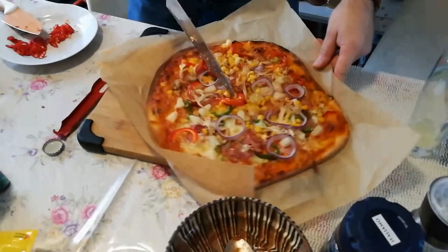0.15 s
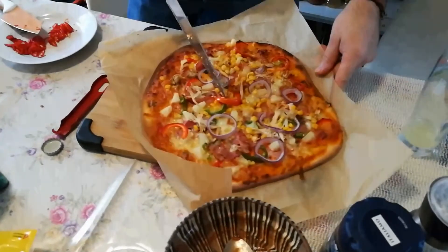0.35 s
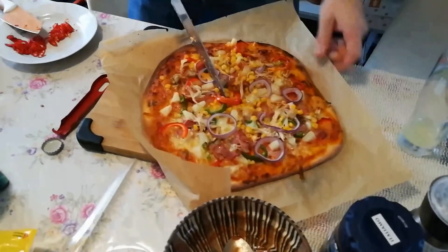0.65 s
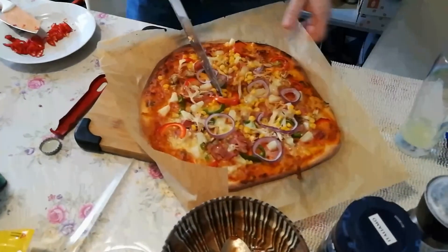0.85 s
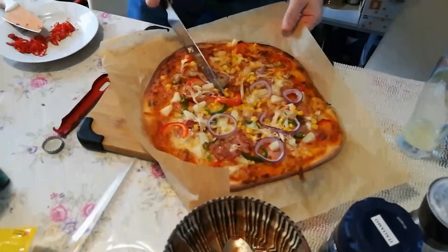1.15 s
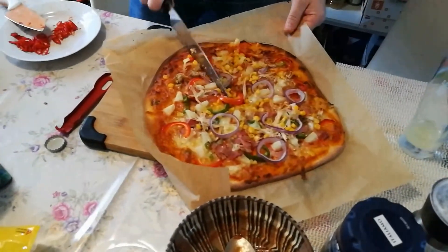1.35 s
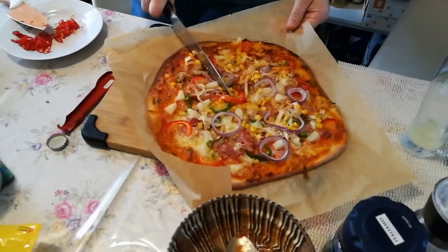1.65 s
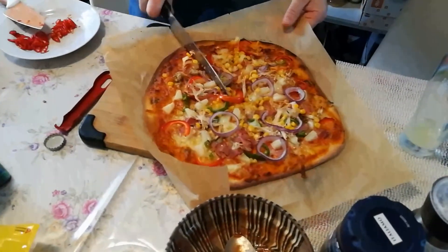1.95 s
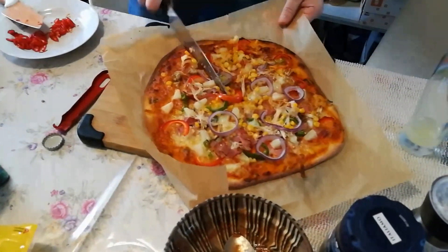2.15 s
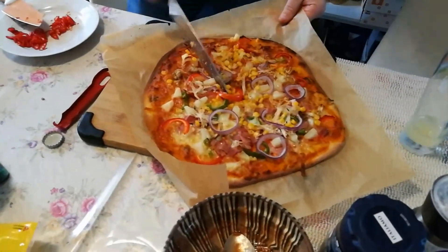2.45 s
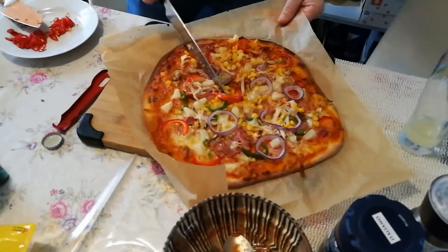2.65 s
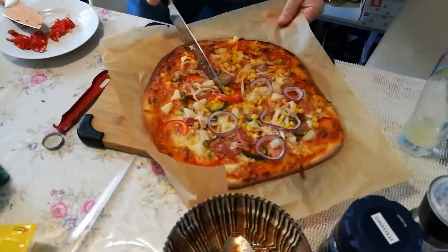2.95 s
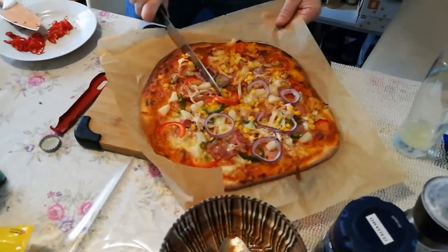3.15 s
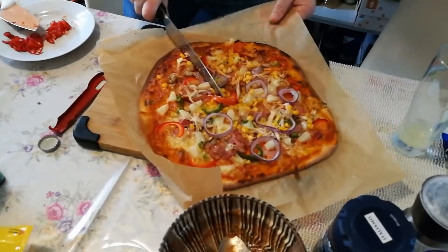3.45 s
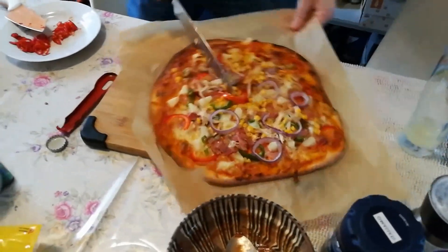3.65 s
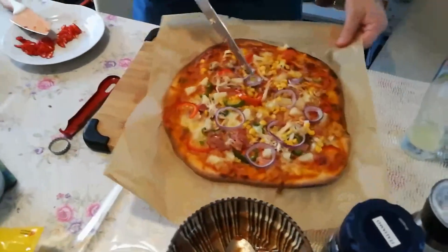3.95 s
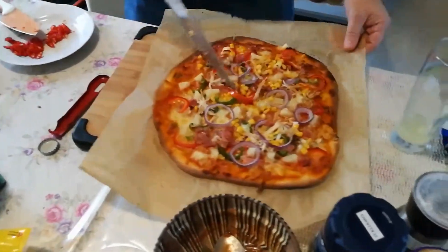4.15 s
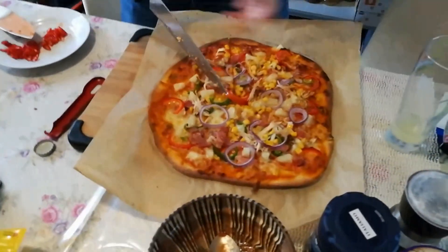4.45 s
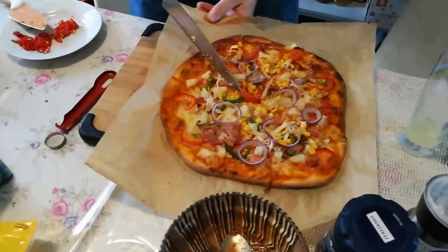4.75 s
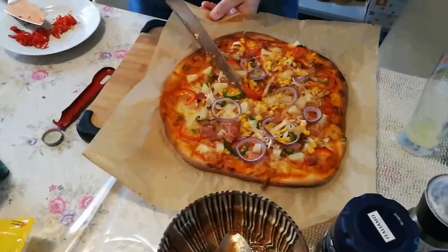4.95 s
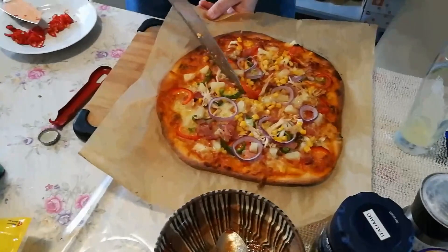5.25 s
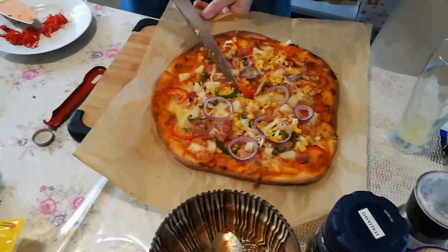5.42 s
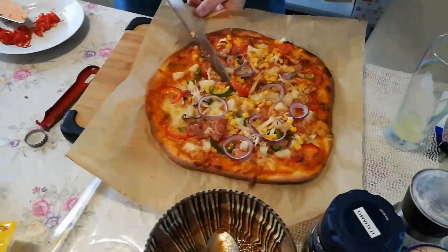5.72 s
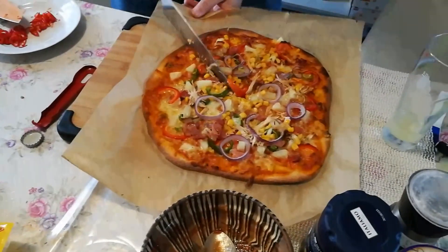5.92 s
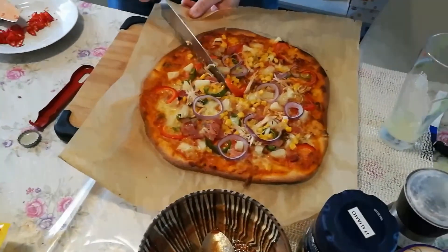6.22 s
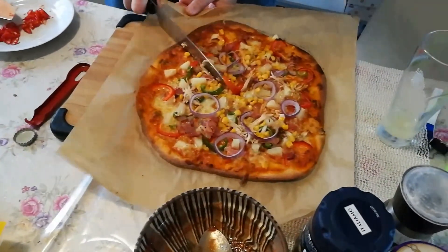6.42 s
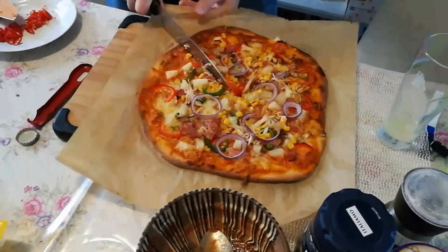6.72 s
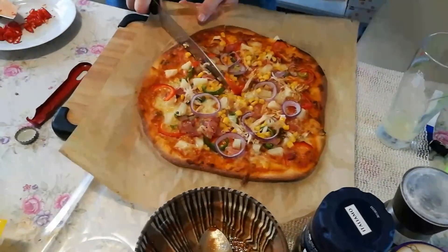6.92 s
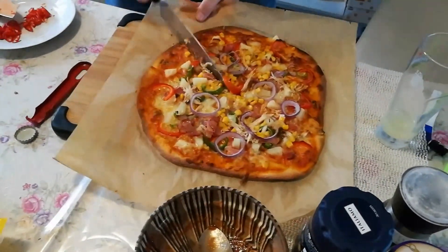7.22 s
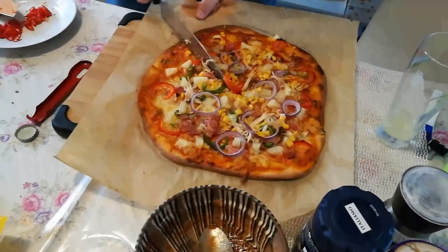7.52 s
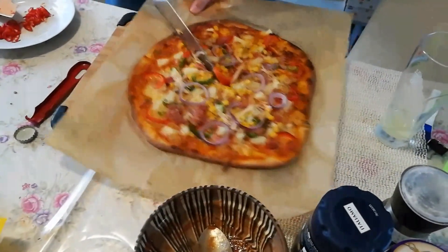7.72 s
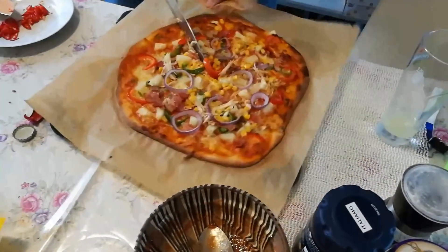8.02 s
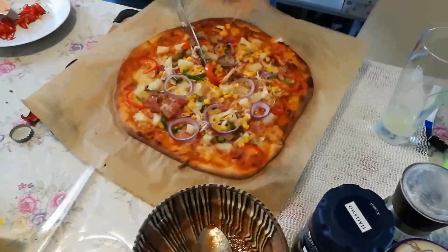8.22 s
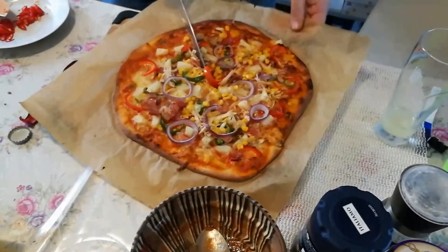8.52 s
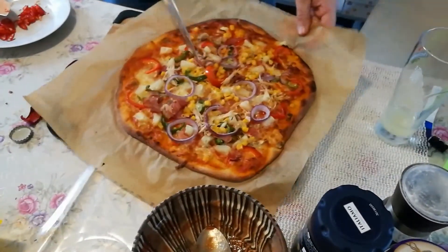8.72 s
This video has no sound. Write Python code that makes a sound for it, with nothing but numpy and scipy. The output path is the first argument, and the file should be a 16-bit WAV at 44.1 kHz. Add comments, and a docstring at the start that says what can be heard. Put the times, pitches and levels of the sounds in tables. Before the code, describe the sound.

Close stereo pickup from above a kitchen table. Baking paper rustles sharply and fades, then a knife presses through crisp crust with short dry crunches, ticks and knocks. Around the middle the paper is dragged in crackling bursts, a brief lull follows, more cutting comes, and the loudest dragging ends it. Low board thumps lie beneath, in a small room with a faint fridge whine.

```python
"""A knife saws through a crisp pizza crust on baking paper over a wooden board; between cuts a hand drags the paper.
Crumbs and paper crackle as streams of tiny noise fractures in size bands; single fractures crack, tick and knock.
The pressed crust crunches duller through the board modes; table top, flexing board and legs hum low as ringing noise.
Two microphone ports hear it from above in a small quiet kitchen with a short room tail and a faint fridge whine."""
import sys
import numpy as np
from scipy import signal
from scipy.fft import rfft, irfft, next_fast_len
from scipy.io import wavfile
from scipy.ndimage import uniform_filter1d

SR = 44100
rng = np.random.default_rng(int(sys.argv[2]) if len(sys.argv) > 2 else 0)


def unload_audio(sound):
    """Save the sound as a 16-bit wav file, at the path given as the first command line argument."""
    columns = np.transpose(np.atleast_2d(sound))
    # keep every value between -1 and 1, then stretch to whole-number steps
    steps = np.round(np.clip(columns, -1, 1) * 32767)
    wavfile.write(sys.argv[1], SR, steps.astype(np.int16))


N = 391166
T = np.arange(N) / SR
SIZE = next_fast_len(N + SR)
HZ = np.arange(SIZE // 2 + 1) * SR / SIZE


def undb(db):
    """Amplitude factor of a level in dB."""
    return 10 ** (np.asarray(db) / 20)


def power_db(power):
    """Level in dB of a power."""
    return 10 * np.log10(power)


def level(x, db):
    """Scale x to an rms level in dB."""
    return x * undb(db) / np.sqrt(np.mean(x ** 2))


def along(table):
    """Read a (Hz, value) table on a log-frequency axis."""
    hz, value = np.transpose(table)
    return np.interp(np.log(HZ + 1), np.log(hz), value)


def shape(x, gain):
    """Filter x by a gain per frequency bin."""
    return irfft(rfft(x, SIZE) * gain, SIZE)[..., :N]


def modes(table):
    """Summed response of a body with (Hz, width Hz, dB) resonances."""
    response = 0
    for hz, width_hz, db in table:
        damping = 1j * HZ * width_hz
        response = response + undb(db) * damping / (hz ** 2 - HZ ** 2 + damping)
    return response


# likeness of the ports: pitch_hz, left_right_correlation (negative values play as 0)
PORT_LIKENESS = [(90, .99), (200, .96), (330, .5), (640, .25), (1000, .6), (1450, .85), (2100, .3),
                 (2800, -.15), (5000, 0)]


def port_noise():
    """White noise at two ports: alike in the bass, unrelated in the treble."""
    alike = np.clip(along(PORT_LIKENESS), 0, 1)
    mid = shape(rng.standard_normal(N), np.sqrt((1 + alike) / 2))
    side = shape(rng.standard_normal(N), np.sqrt((1 - alike) / 2))
    return np.array([mid + side, mid - side])


# colour of the quiet air: pitch_hz, relative_density_db (per Hz)
KITCHEN = [(15, -40), (25, -28.5), (33, -20), (123, -17.5), (195, -6.5), (223, -29), (285, -14.5),
           (344, -14), (463, -31), (516, -22.5), (1020, -24.5), (1100, -19), (1190, -29), (3160, -28),
           (16000, -53.5)]
# fridge whine: pitch_hz, rms_db
FRIDGE = [(1087, -84.5)]
KITCHEN_DB = -71


def kitchen():
    """Quiet air as coloured noise, and the faint sine whine of a fridge."""
    air = level(shape(port_noise(), undb(along(KITCHEN))), KITCHEN_DB)
    whine = 0
    for hz, db in FRIDGE:
        whine = whine + np.sqrt(2) * undb(db) * np.sin(2 * np.pi * (hz * T + rng.random()))
    return air + whine


def swell(rows, start_db, release_db_s):
    """Summed power of (start_s, rise_s, hold_s, db) events that rise, hold and die away within a second."""
    power = np.full(N + SR, 1e-12)
    t = T[:SR]
    for start_s, rise_s, hold_s, db in rows:
        i = int(start_s * SR)
        rise = start_db * np.maximum(1 - t / rise_s, 0)
        release = release_db_s * np.maximum(t - rise_s - hold_s, 0)
        power[i:i + SR] += undb(2 * (db + rise - release))
    return power[:N]


# one table per drag of the paper: time_s, rustle_db, crunch_db, deep_crunch_db
DRAGS = [
    [(0.0, -37.5, -52, -50), (0.044, -31, -39, -45), (0.066, -37, -45, -52), (0.116, -37, -52, -45.5),
     (0.244, -41.5, -48, -53), (0.294, -46, -51, -65), (0.312, -47, -61, -50), (0.376, -51.5, -54, -61),
     (0.53, -45.5, -50, -58), (0.654, -63, -67, -81), (0.664, -58, -52, -96), (0.72, -69, -78, -90)],
    [(3.395, -51, -70, -65), (3.415, -33, -44.5, -43), (3.451, -46, -58, -63), (3.465, -46, -40, -48),
     (3.505, -42.5, -63, -57), (3.653, -32, -46, -44.5), (3.659, -35, -47, -52), (3.869, -40.5, -50, -51.5),
     (4.135, -37.5, -48, -52.5), (4.175, -46, -49, -52), (4.255, -58, -66, -74), (4.3, -74, -74, -75)],
    [(4.31, -63, -71, -80), (4.348, -40, -43, -56), (4.374, -32.5, -44.5, -44), (4.61, -47, -60, -64),
     (4.662, -43, -52, -64), (4.692, -32.5, -39, -41.5), (4.794, -46.5, -57.5, -65), (4.862, -60, -57, -72),
     (4.87, -52.5, -45, -64), (4.922, -63, -76, -88), (4.94, -57, -58, -63), (5.07, -93, -88, -79)],
    [(7.47, -50, -53, -55), (7.478, -53, -45, -62), (7.51, -42, -47, -67), (7.522, -41, -49, -47),
     (7.566, -37, -45, -50), (7.614, -33.5, -41.5, -40.5), (7.71, -35.5, -47, -46),
     (7.842, -34, -45.5, -45), (7.868, -29.5, -38, -40.5), (8.174, -36, -45.5, -48),
     (8.192, -40.5, -41, -54), (8.22, -45, -56, -60)],
    [(8.23, -44, -47, -49), (8.252, -51, -53, -62), (8.258, -42.5, -44, -57), (8.42, -33, -49.5, -46.5),
     (8.486, -46, -53, -65), (8.526, -30, -46, -38), (8.544, -33.5, -52, -46), (8.614, -36, -54, -47.5),
     (8.826, -35.5, -45, -47.5), (8.836, -38, -39, -35), (8.854, -43, -58, -57), (8.87, -30.5, -41, -46)],
]
DRAG_FINE_DB = -5.5  # fine fizz relative to the rustle


def drags(k, fizz):
    """Power of level column k as a hand drags the paper; fizz=1 gives the fine fizz."""
    power = 0
    for drag in DRAGS:
        time_s, *columns = np.transpose(drag)
        moving = (T >= time_s[0]) * (T < time_s[-1])
        db = np.interp(T, time_s, columns[k]) + fizz * DRAG_FINE_DB
        power = power + moving * undb(2 * db)
    return power


# knife strokes: start_s, rise_s, hold_s, rustle_db, crunch_db, deep_crunch_db, fizz_db (relative to rustle)
STROKES = [(0.75, .005, .01, -55.5, -57, -76, -4), (0.85, .005, .01, -60, -76, -67, -1),
           (1.135, 0.048, .01, -50.5, -60, -52, -4), (1.192, 0.004, 0.012, -33.5, -38, -37, -5),
           (1.272, 0.0084, .03, -52, -67, -53.5, -7), (1.395, .005, .02, -53.5, -60, -70, -5),
           (1.472, 0.0065, 0.028, -32, -33, -36.5, -4.5), (1.514, .01, 0.015, -46, -52, -32.5, -6),
           (1.572, .02, 0.034, -48, -54.5, -53, -8), (1.699, 0.066, 0.033, -42.5, -53, -48.5, -5),
           (1.936, 0.013, 0.0083, -43.5, -43, -40, -4), (2.003, 0.028, .04, -47, -55, -58, -10),
           (2.152, 0.056, 0.086, -46.5, -51, -60.5, -6.5), (2.57, 0.094, 0.068, -54, -55, -60, -7),
           (2.851, 0.011, 0.035, -51, -54, -76, -6.5), (3.03, 0.0046, 0.073, -49.5, -49, -54.5, -4.5),
           (3.24, 0.011, 0.034, -59.5, -65, -70, -7), (3.284, 0.016, 0.081, -50.5, -62, -59, -5.5),
           (5.702, 0.0071, 0.06, -59, -63, -74, -3.5), (5.787, 0.016, 0.037, -43.5, -52, -63, -5),
           (5.862, 0.012, .11, -44, -62, -53.5, -7.5), (5.986, 0.016, 0.094, -45, -50.5, -55.5, -10),
           (6.256, 0.048, 0.032, -35, -39, -36.5, -4), (6.362, 0.016, 0.088, -40, -50, -52.5, -9.5),
           (6.535, 0.051, 0.022, -37, -52, -51, -6), (6.594, 0.019, 0.011, -36, -44, -34, -4),
           (6.687, .02, 0.082, -43, -52, -57.5, -10), (6.824, .004, 0.026, -39, -53, -37, -2),
           (6.845, 0.03, 0.065, -33.5, -47, -46.5, -6.5), (6.945, 0.016, 0.093, -45, -63, -56, -9.5),
           (7.142, 0.0077, 0.035, -45.5, -53.5, -68, -10)]
STROKE_START_DB = -23  # a stroke swells from this far below its level


def strokes(k, fizz, release_db_s):
    """Power of level column k as the knife strokes swell and die away; fizz=1 gives the fine fizz."""
    rows = [(*row[:3], row[3 + k] + fizz * row[-1]) for row in STROKES]
    return swell(rows, STROKE_START_DB, release_db_s)


SETTLE_DB = -79, -88, -77  # constant floor of settling paper and crust: rustle, crunch, deep crunch
SETTLE_FINE_DB = -5  # fine fizz relative to the settling rustle
RUSTLE_RELEASE_DB_S, CRUNCH_RELEASE_DB_S, DEEP_RELEASE_DB_S, FIZZ_RELEASE_DB_S = 153.5, 380.5, 307, 209


def work():
    """Levels in dB of rustle, crunch, deep crunch and fizz from settling, drags and strokes together."""
    levels = []
    for k, release_db_s, fizz in ((0, RUSTLE_RELEASE_DB_S, 0), (1, CRUNCH_RELEASE_DB_S, 0),
                                  (2, DEEP_RELEASE_DB_S, 0), (0, FIZZ_RELEASE_DB_S, 1)):
        settling = undb(2 * (SETTLE_DB[k] + fizz * SETTLE_FINE_DB))
        levels.append(power_db(settling + drags(k, fizz) + strokes(k, fizz, release_db_s)))
    return levels


# pushes on the board: start_s, hold_s, table_top_db, board_flex_db, legs_db
PUSHES = [(0.03, 0.11, -55, -54.5, -86), (1.174, 0.032, -54.5, -61, -66), (1.449, 0.057, -54, -57.5, -68),
          (1.93, 0.054, -52, -64, -61), (2.083, .1, -67, -77, -72), (2.595, 0.037, -66, -77, -85),
          (3.046, 0.023, -63, -76, -67), (3.391, 0.032, -54.5, -58.5, -60), (3.594, 0.027, -68, -56.5, -72),
          (3.68, 0.045, -63, -63, -77), (3.78, 0.047, -62, -60.5, -79), (4.08, .04, -57.5, -61, -74),
          (4.32, 0.046, -52.5, -57.5, -54), (4.384, .07, -55, -60, -61), (4.639, 0.08, -53.5, -59.5, -76),
          (5.13, 0.13, -68.5, -80, -78), (5.36, .12, -72, -80, -80), (5.657, 0.051, -74, -64.5, -87),
          (5.82, .15, -70, -71, -82), (6.27, 0.11, -57, -59, -64), (6.565, 0.08, -62, -56, -72),
          (6.832, 0.069, -57.5, -57, -64), (7.627, 0.09, -64, -63, -85), (7.844, .1, -51.5, -49, -78),
          (8.01, 0.14, -58, -67, -78), (8.217, 0.081, -56, -70, -70), (8.32, .05, -50, -57.5, -68),
          (8.48, .1, -56, -54, -82), (8.702, 0.033, -58, -66, -85)]
PUSH_RISE_S, PUSH_START_DB, PUSH_RELEASE_DB_S = 0.052, -24, 131


def pushes(column, rest_db):
    """Level in dB of one body: swelling at each push over its resting level."""
    rows = [(row[0], PUSH_RISE_S, row[1], row[column]) for row in PUSHES]
    return power_db(undb(2 * rest_db) + swell(rows, PUSH_START_DB, PUSH_RELEASE_DB_S))


def shake(body, db, steady_s):
    """Noise rings the low modes of a body, its own swells partly evened out over steady_s."""
    ring = shape(port_noise(), modes(body) ** 2)
    ring_power = uniform_filter1d(np.mean(ring ** 2, axis=0), int(steady_s * SR))
    return level(ring / ring_power ** 0.37, 0) * undb(db)


# table top modes: pitch_hz, width_hz, gain_db (summed response is squared)
TABLE = [(83.5, 28, -9.5), (123.5, 20.7, 5.5), (167.4, 49, 0)]


def table_top():
    """The table top hums in its low modes when the board is pushed."""
    return shake(TABLE, pushes(column=2, rest_db=-73), steady_s=0.054)


# board flexing modes: pitch_hz, width_hz, gain_db (summed response is squared)
FLEX = [(321, 92, 6), (421, 40, 0.5), (527, 360, 3)]


def board_flex():
    """The board flexes under the pushes and rings in its bending modes."""
    return shake(FLEX, pushes(column=3, rest_db=-76.5), steady_s=0.022)


# table leg modes: pitch_hz, width_hz, gain_db (summed response is squared)
LEGS = [(32.1, 20, -2.5), (67.3, 39, -1.5)]


def legs():
    """The table rocks on its legs in very low modes."""
    return shake(LEGS, pushes(column=4, rest_db=-81.5), steady_s=0.1)


def grains(rate_hz, spread_db, decay_s, rub):
    """Strength of a stream of tiny fractures, few large and many small, over an even rub; rms 1."""
    when, size = rng.random(N), rng.exponential(size=N)
    power = (when < rate_hz / SR) * undb(2 * spread_db * np.minimum(size, 3))
    keep = np.exp(-1 / (decay_s * SR))
    power = signal.lfilter([1], [1, -keep], power)
    return level(np.sqrt(power / power.mean() + rub), 0)


# single fractures, loud and quiet: start_s, crack_db, tick_db, knock_db, knock_hz, ring_t60_s
# tick_db and knock_db lie CREST_DB below the start; each use scales ring_t60_s
SNAPS = [(0.0344, -25, -44, -42, 2710, 0.016), (0.0982, -19.5, -30, -38, 1010, 0.012),
         (0.2515, -32, -57, -41, 2240, 0.015), (0.3142, -28.5, -38.5, -39, 1510, 0.025),
         (0.394, -41, -51, -48, 2050, 0.015), (0.4803, -39, -54, -35, 2740, 0.014),
         (0.5193, -37, -37, -38, 2760, 0.025), (0.534, -38, -47, -41, 2810, 0.015),
         (0.5783, -41, -60, -35.5, 2270, 0.011), (0.7233, -50, -44, -49, 2810, 0.014),
         (0.7612, -42, -38.5, -55, 1470, 0.021), (0.856, -50, -40, -54.5, 1790, 0.026),
         (1.0355, -48, -63, -58, 826, 0.0085), (1.1993, -38, -29.5, -18.5, 1940, 0.017),
         (1.2132, -29, -39, -44, 1710, 0.013), (1.2847, -27.5, -38, -50, 2830, 0.015),
         (1.3164, -47, -46, -61, 1300, 0.012), (1.4006, -31, -38, -46, 2900, 0.016),
         (1.4804, -33, -29, -27, 2690, 0.015), (1.486, -27, -28, -29, 2570, 0.017),
         (1.5178, -43, -43, -26.5, 1090, 0.014), (1.538, -38, -52, -37, 1260, 0.012),
         (1.6364, -39, -57, -52, 1820, 0.015), (1.706, -51, -54, -56, 1600, 0.021),
         (1.7539, -47, -48, -40, 1450, 0.01), (1.8, -54, -49, -49, 1770, 0.012),
         (1.8622, -36, -44, -47, 1770, 0.015), (1.947, -31, -48, -43, 1380, 0.011),
         (1.9537, -31, -46, -29, 1880, 0.019), (1.9612, -29, -46, -34, 1200, 0.024),
         (1.9706, -32, -52, -30, 1770, 0.02), (2.025, -37, -47, -46, 1750, 0.019),
         (2.044, -38, -39, -45, 2040, 0.015), (2.0557, -43, -44, -43, 1770, 0.015),
         (2.1306, -47, -44.5, -47, 2300, 0.016), (2.1762, -37, -59, -42.5, 1380, 0.013),
         (2.2013, -38, -34, -39.5, 1610, 0.01), (2.2504, -35, -39, -41, 1730, 0.014),
         (2.272, -43, -57, -42, 2240, 0.015), (2.3219, -36, -60, -35.5, 1550, 0.015),
         (2.372, -43, -66, -44.5, 1310, 0.015), (2.3996, -37, -64, -45, 1340, 0.011),
         (2.4637, -57, -68, -57, 1220, 0.015), (2.6172, -50, -68, -52, 1450, 0.021),
         (2.6488, -37, -61, -43, 2080, 0.0068), (2.6663, -34, -45, -43, 1520, 0.015),
         (2.681, -37, -40, -43, 1560, 0.015), (2.7205, -34, -47, -47, 2810, 0.024),
         (2.793, -50, -60, -59, 1510, 0.015), (2.8345, -52, -52, -48, 1920, 0.014),
         (2.8688, -37, -40, -43, 2300, 0.013), (2.9422, -39, -62, -47, 1590, 0.014),
         (2.9696, -53, -77, -47.5, 1860, 0.015), (3.0377, -49, -72, -38, 1180, 0.013),
         (3.0992, -32, -42, -41, 1650, 0.0099), (3.236, -48, -74, -54, 1660, 0.018),
         (3.3087, -45, -58, -46, 1680, 0.015), (3.4093, -28, -27.5, -41, 1750, 0.024),
         (3.4642, -27, -34, -37.5, 1450, 0.027), (3.5465, -36, -38, -53, 1430, 0.012),
         (3.602, -42, -40, -44, 1890, 0.015), (3.63, -36, -44, -35, 1490, 0.015),
         (3.6464, -40, -41, -30.5, 1420, 0.015), (3.6877, -27, -32, -31, 1580, 0.017),
         (3.762, -30, -37, -37, 1460, 0.015), (3.7926, -29, -43, -35, 1520, 0.015),
         (3.8454, -37, -33, -39, 2880, 0.013), (3.8732, -28, -35.5, -38, 2850, 0.015),
         (3.923, -39, -52, -47, 2990, 0.012), (3.9494, -37, -41, -45, 2230, 0.015),
         (3.9913, -43, -41, -45, 2150, 0.0097), (4.0443, -30, -29, -34, 1640, 0.013),
         (4.0976, -31, -37, -31.5, 2570, 0.015), (4.124, -44, -29.5, -41, 2550, 0.012),
         (4.1799, -30.5, -42, -36, 1780, 0.021), (4.2422, -34, -38.5, -58, 2140, 0.015),
         (4.3438, -33, -33.5, -34, 2570, 0.0095), (4.3927, -32, -31.5, -35, 1430, 0.014),
         (4.454, -36, -35, -43, 1570, 0.012), (4.5293, -41, -58.5, -34, 1430, 0.017),
         (4.6016, -29.5, -50, -49, 2220, 0.013), (4.6464, -39, -35, -34.5, 1690, 0.012),
         (4.6754, -44, -44, -44, 1250, 0.013), (4.6884, -48, -42, -34, 1260, 0.0053),
         (4.8708, -31.5, -57.5, -48, 1830, 0.015), (4.89, -38, -48, -55, 1870, 0.015),
         (4.9405, -40, -46, -50.5, 1840, 0.015), (4.9798, -42, -50, -63, 2040, 0.017),
         (5.14, -69, -65, -71, 1090, 0.015), (5.1874, -71, -74, -77, 821, 0.015),
         (5.362, -56, -78, -57, 1090, 0.015), (5.4006, -62, -80, -73, 1090, 0.015),
         (5.7074, -47, -72, -47.5, 1290, 0.018), (5.7214, -58, -52, -59, 1310, 0.015),
         (5.7966, -51, -45, -40.5, 1880, 0.013), (5.81, -44, -54, -38, 1520, 0.015),
         (5.824, -30, -42, -49, 1480, 0.011), (5.8599, -27, -31.5, -36, 1580, 0.015),
         (5.8848, -31, -47, -42, 1800, 0.018), (5.931, -44, -47, -36.5, 1490, 0.015),
         (6.0038, -26, -35, -38.5, 2010, 0.02), (6.0241, -22, -27, -39, 2570, 0.019),
         (6.0573, -32, -37, -40, 1690, 0.015), (6.104, -33, -36, -44, 2200, 0.024),
         (6.2331, -31.5, -50, -48, 2140, 0.014), (6.259, -39, -49, -46, 2080, 0.012),
         (6.2767, -28, -38, -35.5, 1760, 0.011), (6.299, -23, -27.5, -35, 1210, 0.018),
         (6.3132, -34, -30, -32, 1120, 0.018), (6.3634, -41, -38, -39, 1750, 0.015),
         (6.383, -44, -36, -43, 1760, 0.019), (6.4202, -40, -35, -38, 770, 0.021),
         (6.453, -33, -26.5, -48, 2280, 0.015), (6.5512, -38, -35, -51.5, 1710, 0.01),
         (6.5948, -31, -30, -35, 1440, 0.011), (6.6204, -29, -37, -30, 1140, 0.017),
         (6.6286, -33, -27, -31, 1750, 0.013), (6.693, -32, -39, -47, 1820, 0.015),
         (6.7017, -32, -37, -51, 1170, 0.016), (6.729, -32, -30, -55, 1770, 0.019),
         (6.8293, -52, -49, -26.5, 1210, 0.012), (6.8364, -39, -38, -33, 1150, 0.0091),
         (6.866, -34, -44, -34, 1450, 0.015), (6.879, -36, -42, -30.5, 1210, 0.011),
         (6.896, -28, -27, -25.5, 2060, 0.017), (6.9692, -25, -30, -35.5, 1560, 0.013),
         (6.987, -30, -27, -39, 1420, 0.018), (7.0616, -43, -38, -47, 1840, 0.015),
         (7.123, -41, -50, -44, 1430, 0.011), (7.16, -32, -30, -36, 2170, 0.027),
         (7.2716, -36, -49, -45, 2570, 0.014), (7.2918, -51, -58, -62, 2730, 0.015),
         (7.3839, -57, -62, -51, 1650, 0.014), (7.427, -54, -60, -65, 2000, 0.014),
         (7.4814, -55, -31, -41, 1490, 0.014), (7.5252, -36, -44, -36, 1230, 0.015),
         (7.592, -30, -36, -40, 1710, 0.015), (7.6157, -24, -45, -28.5, 1720, 0.015),
         (7.6724, -35, -36, -42, 1520, 0.013), (7.7461, -36, -36, -45, 1170, 0.012),
         (7.7864, -41, -49, -31, 2200, 0.012), (7.8615, -24, -30.5, -33, 1800, 0.023),
         (7.8914, -33, -34, -24, 1420, 0.02), (7.9491, -14.5, -29, -29, 2060, 0.027),
         (8.0186, -27, -37, -37, 1530, 0.015), (8.0572, -31, -32, -39, 2540, 0.015),
         (8.1004, -30, -33.5, -41, 1730, 0.021), (8.1796, -27, -38, -43, 1520, 0.015),
         (8.1933, -24, -36, -35, 1810, 0.015), (8.2607, -22.5, -35, -34, 2580, 0.019),
         (8.3045, -42, -45, -35, 2010, 0.015), (8.329, -32, -32.5, -31, 2900, 0.015),
         (8.4663, -31, -36, -38, 1580, 0.015), (8.5034, -17.5, -37, -32, 1560, 0.021),
         (8.524, -16.5, -22, -36, 2880, 0.013), (8.5734, -24, -42, -37, 2150, 0.015),
         (8.6537, -26, -38, -39, 3020, 0.015), (8.675, -23, -37, -41, 2860, 0.015),
         (8.7104, -25, -31.5, -34, 2330, 0.024), (8.8002, -27, -30, -38, 2120, 0.018),
         (8.836, -27, -36, -30.5, 1770, 0.014)]
CREST_DB = 3
CHANCE_DB, CHANCE_SPREAD_DB = 1.5, 4  # further fractures, relative to the rustle around them
CHANCE_T60_S, CHANCE_HZ = 0.011, (1100, 2600)


def fractures(rustle_db, count=70):
    """Rows of the fractures at listed times, and further ones at chance times whose levels follow the rustle."""
    even, bell = rng.random((count, 2)), rng.standard_normal((count, 3))
    start_s = even[:, 0] * T[-1]
    db = np.interp(start_s, T, rustle_db)[:, None] + CHANCE_DB + CHANCE_SPREAD_DB * bell
    low_hz, high_hz = CHANCE_HZ
    knock_hz = low_hz + (high_hz - low_hz) * even[:, 1]
    listed = np.array(SNAPS) + [0, 0, CREST_DB, CREST_DB, 0, 0]
    chance = np.column_stack([start_s, db, knock_hz, np.full(count, CHANCE_T60_S)])
    return np.vstack([listed, chance])


def fade(t60_s, t):
    """A sudden start, an exponential fade, and weaker crumbling that trails after."""
    return undb(-60 * t / t60_s) + undb(-18.5 - 60 * t / (t60_s + 0.17))


def snaps(rows, column, linger):
    """Strength of the single fractures, each a sudden start and a fade."""
    out, t = np.zeros(N + SR), T[:SR // 8]
    for row in rows:
        i = int(row[0] * SR)
        out[i:i + len(t)] += undb(row[column]) * fade(linger * row[5], t)
    return out[:N]


# colour of crumbs and paper: pitch_hz, relative_density_db (per Hz)
CRACKLE = [(290, -21), (500, -21), (641, -16), (700, -9), (872, -30), (1480, -4), (1920, -12.5), (2160, -3),
           (6280, -2.5), (10000, -1.5), (15100, -9), (15800, -29), (16500, -59.5)]
# band centres of crumbs and creases, large to small: pitch_hz
PIECE_HZ = [1000, 1600, 2500, 3800, 5700, 8500, 12700]
FINE_HZ = 5560  # crossover from cracks to fine ticks and fizz


def crackle(db, fine_db, rows):
    """Dry crumbs and paper: sizes break partly together, partly alone, so each crackle has its own colour."""
    colour = undb(along(CRACKLE))
    colour = colour / np.sqrt(np.mean(colour ** 2))
    common = grains(250, spread_db=3.6, decay_s=0.00034, rub=2.7)
    noise = port_noise()
    ticks = snaps(rows, column=2, linger=0.65)
    cracks = snaps(rows, column=1, linger=0.72)
    spectrum = 0
    for k, hz in enumerate(PIECE_HZ):
        band = np.interp(np.log(HZ + 1), np.log(PIECE_HZ), np.arange(len(PIECE_HZ)) == k)
        fine = 1 / (1 + (FINE_HZ / hz) ** 6)
        crack_cut_db = 5 * max(3 - hz / 1100, 0)  # single cracks carry little in the low bands
        alone = grains(160, spread_db=4, decay_s=7.1 / hz, rub=1.3)
        stream = undb(db + fine * fine_db) * common * alone
        force = stream + fine * ticks + (1 - fine) * cracks * undb(-crack_cut_db)
        spectrum = spectrum + rfft(force * noise, SIZE) * colour * band
    return irfft(spectrum, SIZE)[:, :N]


def knocks(rows, sharpness):
    """Each fracture rings its piece of crust on a pitch of its own."""
    t = T[:SR // 8]
    noise = np.pad(port_noise(), ((0, 0), (0, len(t))))
    out = np.zeros((2, N + len(t)))
    for start_s, _, _, db, hz, t60_s in rows:
        i = int(start_s * SR)
        b, a = signal.iirpeak(hz, sharpness, SR)
        unit = np.sqrt(sharpness * SR / (2 * np.pi * hz))  # makes up for the noise outside the resonance
        burst = noise[:, i:i + len(t)] * fade(1.06 * t60_s, t)
        out[:, i:i + len(t)] += undb(db) * unit * signal.lfilter(b, a, burst)
    return out[:, :N]


# colour of the crushed crust: pitch_hz, relative_density_db (per Hz)
CRUNCH = [(250, -46), (500, -19), (800, -7.5), (1200, -3), (2200, 4), (3200, -1.5), (5000, -29.5)]
# board modes: pitch_hz, width_hz, gain_db
BOARD = [(845, 44, -1), (1150, 270, -3), (1770, 53, 2.5), (2040, 260, -12.5), (2570, 12, -9),
         (3206, 370, 1)]
DEEP_HZ = 1300  # thick crust pressed hard sounds below this


def crunch(db, deep_db, rows):
    """The blade crushes crust against the board, exciting its modes; a deep part has its own level."""
    colour = undb(along(CRUNCH)) * (0.7 + modes(BOARD))
    deep = 1 / (1 + (HZ / DEEP_HZ) ** 6)
    out = knocks(rows, sharpness=4.2)
    for part_db, share in ((db, 1 - deep), (deep_db, deep)):
        part = colour * np.sqrt(share)
        part = part / np.sqrt(np.mean(np.abs(part) ** 2))
        force = undb(part_db) * grains(200, spread_db=3.4, decay_s=0.003, rub=0.49)
        out = out + shape(force * port_noise(), part)
    return out


ROOM_T60_S, ROOM_RISE_S, ROOM_DB = 0.3, 0.0055, -8.5


def room(x):
    """Short diffuse tail of fading noise, different at each port."""
    t = T[:SR // 2]
    tail = rng.standard_normal((2, len(t))) * undb(-60 * t / ROOM_T60_S) * np.minimum(t / ROOM_RISE_S, 1)
    tail = tail / np.sqrt(np.sum(tail ** 2, axis=1, keepdims=True))
    return undb(ROOM_DB) * shape(x, rfft(tail, SIZE))


# port balance: pitch_hz, left_minus_right_db
PORT_BALANCE = [(700, 1.8), (1400, -.8), (2800, .4), (5600, .8), (8000, 5), (10000, 8.5), (13000, 4.5)]


def ports(x):
    """The left port faces the board and hears more treble."""
    lean_db = along(PORT_BALANCE) / 2
    return shape(x, undb(np.array([lean_db, -lean_db])))


def scene():
    """Crackle and crunch in the room, over the shaken bodies and the kitchen."""
    rustle_db, crunch_db, deep_db, fizz_db = work()
    rows = fractures(rustle_db)
    cut = crackle(rustle_db, fizz_db - rustle_db, rows) + crunch(crunch_db, deep_db, rows)
    cut = ports(cut + room(cut))
    return cut + table_top() + board_flex() + legs() + kitchen()


TOP_HZ = 16400


def record(dry):
    """A steep elliptic low-pass cuts the top."""
    lowpass = signal.ellip(10, 0.2, 80, TOP_HZ, fs=SR, output="sos")
    return signal.sosfilt(lowpass, dry)


dry = scene()
out = record(dry)
unload_audio(out)
```